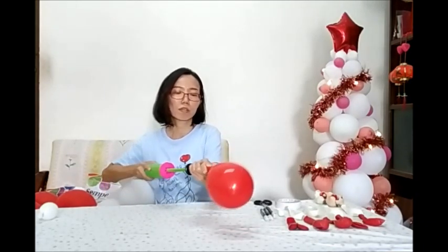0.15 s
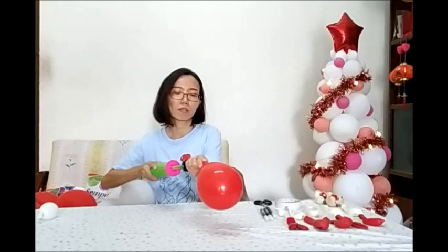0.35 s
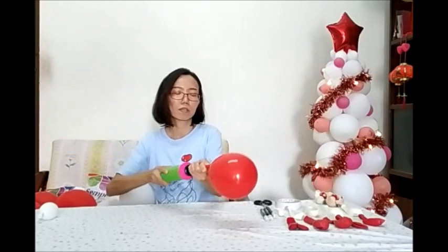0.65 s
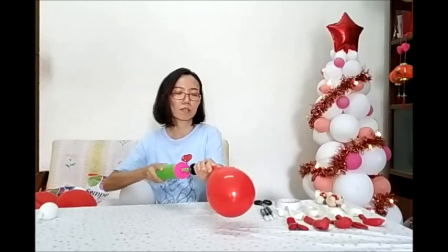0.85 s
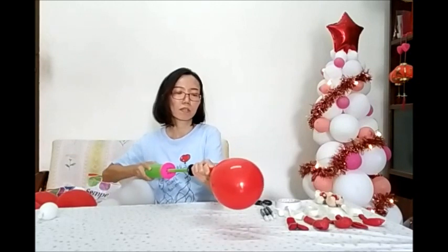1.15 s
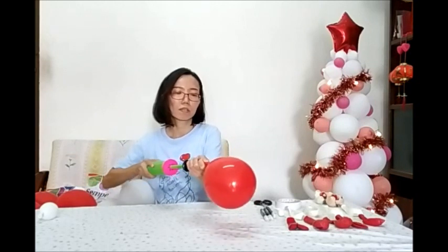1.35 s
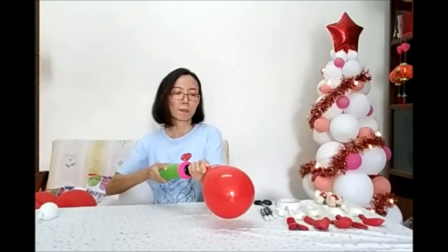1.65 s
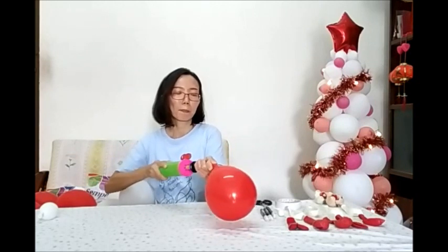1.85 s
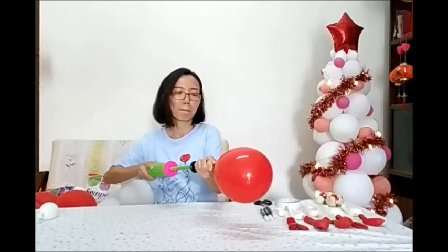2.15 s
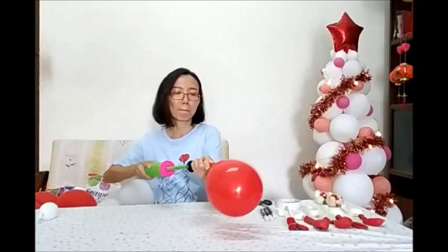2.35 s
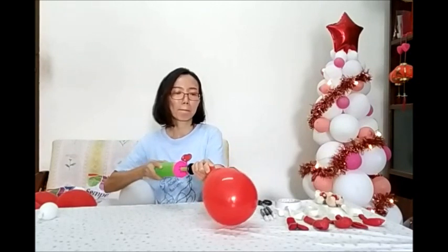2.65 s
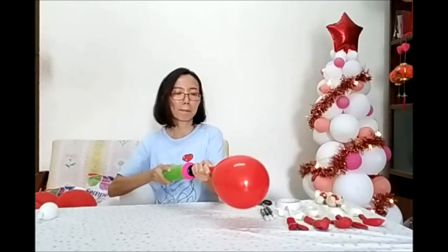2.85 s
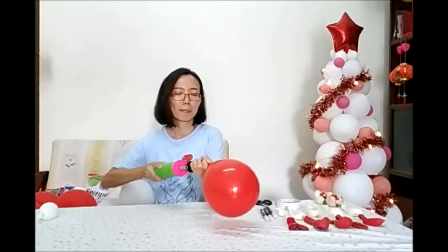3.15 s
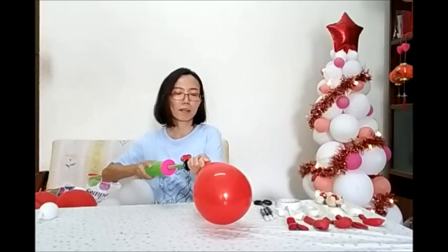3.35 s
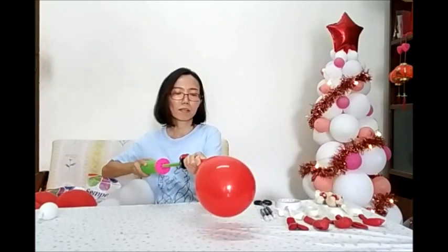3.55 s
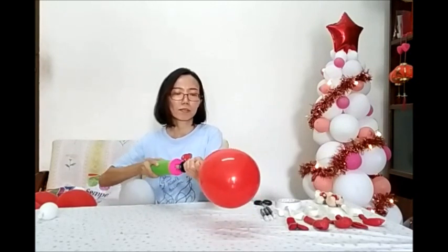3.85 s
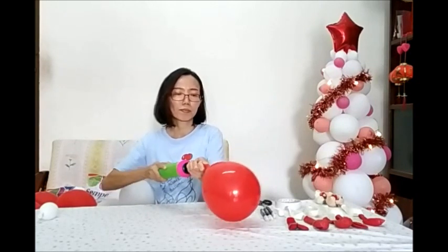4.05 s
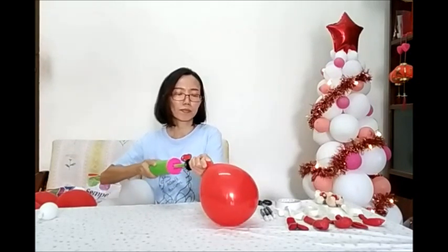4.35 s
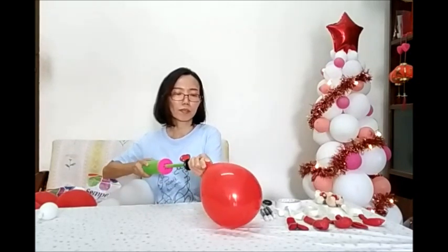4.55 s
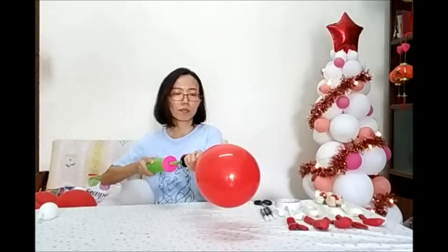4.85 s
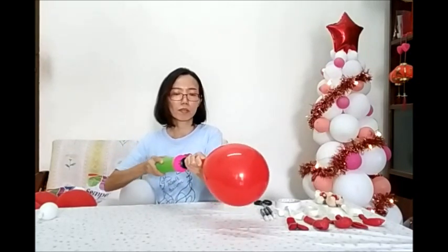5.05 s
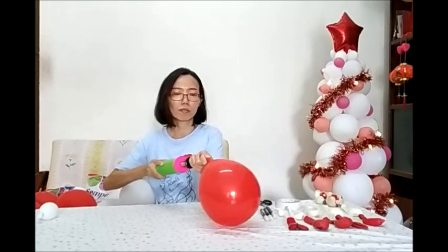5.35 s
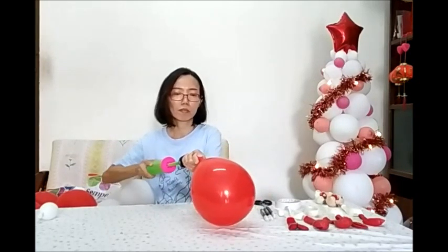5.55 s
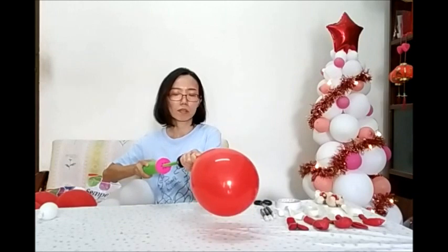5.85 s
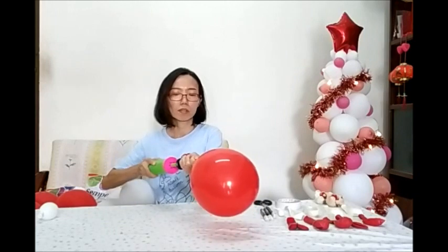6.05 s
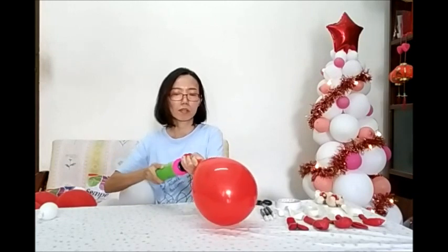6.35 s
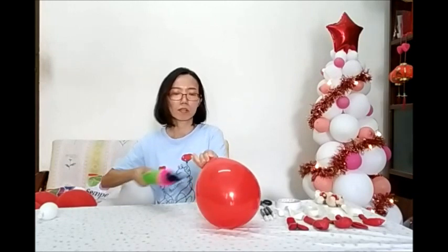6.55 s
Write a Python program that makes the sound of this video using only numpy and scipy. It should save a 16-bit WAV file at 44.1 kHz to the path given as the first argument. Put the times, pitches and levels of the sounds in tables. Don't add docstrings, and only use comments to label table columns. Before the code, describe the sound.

Quiet ventilation rumbles while air rushes through a pump nozzle in short, abrupt hisses, pull then push, six pushes in all. Valves puff open and tick faintly as strokes begin; the piston knocks its stop after each push, the fourth knock hardest. An arm thumps the cloth-covered table occasionally, deepest near the end. Close, slightly right of centre, small indoor room, treble a little grainy and cut off at the top.

```python
import sys
import numpy as np
from scipy import signal
from scipy.fft import rfft, irfft, next_fast_len
from scipy.io import wavfile
from scipy.ndimage import uniform_filter1d

SR = 44100
rng = np.random.default_rng(int(sys.argv[2]) if len(sys.argv) > 2 else 0)


def volts(x):
    e = np.asarray(x, float) / 20
    return 10 ** e


def wav_out(sig):
    wavfile.write(sys.argv[1], SR, np.round(np.clip(np.atleast_2d(sig).T, -1, 1) * 32767).astype(np.int16))


N = 296114


def rms_one(x):
    return x / np.sqrt(np.mean(x ** 2) + 1e-20)


def at_hz(points, hz):
    table_hz, value = np.array(points)[:, 0], np.array(points)[:, 1]
    return np.interp(np.log(hz), np.log(table_hz), value)


def colour(x, spectrum):
    size = next_fast_len(x.shape[-1])
    hz = np.maximum(np.arange(size // 2 + 1) * SR / size, 1)
    return irfft(rfft(x, size) * volts(at_hz(spectrum, hz)), size)[..., :x.shape[-1]]


def flicker(rate_hz):
    r = np.exp(-2 * np.pi * rate_hz / SR)
    noise = rng.standard_normal(N + SR)
    return rms_one(signal.lfilter([1], [1, -2 * r, r * r], noise)[SR:])


def clicks(seconds, db):
    out = np.full(N, 1e-18)
    out[np.round(np.asarray(seconds) * SR).astype(int)] = volts(np.asarray(db))
    return out


def ring(x, hz, t60):
    r = volts(-60 / (t60 * SR))
    w = 2 * np.pi * hz / SR
    return signal.lfilter([0, np.sin(w)], [1, -2 * r * np.cos(w), r * r], x)


def puff(x, fade_s, rise_s):
    fade, rise = volts(-60 / (fade_s * SR)), volts(-60 / (rise_s * SR))
    return signal.lfilter([1 - rise], np.convolve([1, -fade], [1, -rise]), x)


def turbulence(spectrum, eddy_db, gust_db, side_db):
    eddies = volts(eddy_db * flicker(1200) + gust_db * flicker(20))
    mid, side = colour(rng.standard_normal((2, N)) * eddies, spectrum)
    return rms_one(mid + volts(side_db) * side * [[1], [-1]])


# f/Hz, level/dB per Hz
ROOM_AIR = [(13, -7), (25, 12), (60, -4), (95, 0), (140, -4), (200, 3), (260, 2), (350, -4), (960, -6),
            (2200, -15), (4300, -21.5), (9700, -17), (12800, -23), (16000, -29)]
# f/Hz, width/Hz, level/dB
DUCTS = [(92, 8, -60), (202, 8, -61), (534, 1.5, -66)]
# f/Hz, likeness (0 to 1)
LEFT_RIGHT_LIKENESS = [(25, 0.8), (125, 0.96), (250, 0.96), (500, 0.7), (1000, 0.019), (16000, 0.039)]


def background():
    mid, side = rng.standard_normal((2, N))
    share = [(hz, np.clip(c, 0, .99)) for hz, c in LEFT_RIGHT_LIKENESS]
    mid = colour(mid, [(hz, 10 * np.log10(1 + c)) for hz, c in share])
    side = colour(side, [(hz, 10 * np.log10(1 - c)) for hz, c in share])
    air = volts(-49.5) * rms_one(colour(np.array([mid + side, mid - side]), ROOM_AIR))
    ducts = 0
    for hz, width_hz, db in DUCTS:
        ducts = ducts + volts(db) * rms_one(ring(rng.standard_normal(N), hz, 4.8 / width_hz))
    return air + ducts


def stroke_levels(strokes, parts):
    rise_power = 0.97
    t, out = np.arange(N) / SR, np.zeros((len(parts), N))
    for start, rise, hold, full_db, stop_db in strokes:
        age = np.maximum(t - start, 0)
        flow = np.minimum(age / rise, 1) ** rise_power
        flow_db = np.interp(age, [rise, rise + hold], [full_db, stop_db])
        after_stop = np.maximum(age - rise - hold, 0)
        for k, (db, surge_db, surge_s, release) in enumerate(parts):
            surge = surge_db * np.exp(-age / surge_s)
            out[k] += flow * volts(flow_db + db + surge - release * after_stop)
    return out


# start t/s, rise t/s, hold t/s, full-speed jet level/dB, jet level at the stop/dB
PUSHES = [
    (.255, 0.094, 0.23, -28.5, -27.5),
    (1.27, 0.23, 0.14, -27.5, -30.5),
    (2.435, 0.21, 0.17, -28, -27),
    (3.6, 0.31, 0.053, -23, -27.5),
    (4.755, .13, .24, -25.5, -26.5),
    (5.86, 0.19, 0.17, -24.5, -27.5),
]
PULLS = [
    (-.2, 0.16, 0.12, -29, -29.5),
    (.725, 0.17, 0.2, -31, -31),
    (1.775, 0.14, 0.26, -34, -27.5),
    (3.015, 0.25, 0.16, -30, -27),
    (4.135, .18, 0.25, -29, -29),
    (5.265, 0.19, 0.23, -28, -27),
]
SETTLES = [
    (.14, 0.054, .05, -50, -43),
    (1.17, 0.07, .02, -43, -46),
    (3.48, .04, 0.032, -54, -44.5),
    (4.6, .04, .07, -59, -44.5),
    (5.74, .04, .05, -55, -43),
    (6.3, .04, .04, -57, -54),
    (6.4, 0.018, 0.036, -46, -47.5),
]
# level re jet/dB, surge level/dB, surge t/s, release/dB per s
PUSH_PARTS = [(-0.88, -6.3, .05, 155), (-10.5, 4, 0.072, 220), (-0.2, -0.5, 0.13, 133),
              (-18.5, 1.5, 0.043, 121)]
PULL_PARTS = [(1.36, -1.3, .05, 168), (-9.5, -1, .06, 210), (-1, 5.5, 0.12, 130), (-16, 3, 0.07, 117)]
SETTLE_PARTS = [(-3.3, .1, .05, 160), (-18, .1, .05, 140), (-14.5, .1, .05, 47), (-33.5, .1, .05, 40)]
# t/s, leak level at the loosely held neck/dB, valve level as it points at the listener/dB
GRIP = [(0, -2.5, 4), (.34, -11.5, 3), (.55, -8.5, 1), (1, -7.5, -0.5), (1.5, -8, 1), (1.9, -9, 2),
        (2.15, -5.5, 2), (2.65, -12.5, 2.5), (3.3, -9, 1.5), (3.85, -7.5, 1.5), (4.25, -11.5, 5),
        (4.5, -13, 6), (4.95, -8.5, 3), (5.4, -13.5, 4.5), (5.65, -13, 3.5), (6.0, -9.5, 4.5),
        (6.25, -10.5, 5), (6.71, -9, 1)]
# t/s, peak level/dB
CRACKS = [(0.2628, -27), (0.7994, -40), (1.2855, -26.5), (1.8063, -51), (2.441, -34), (3.0494, -54),
          (3.5411, -37), (3.6087, -36), (4.1634, -30), (4.7371, -36), (5.2994, -44), (5.8526, -36),
          (6.4018, -47)]
# t/s, level/dB, t60/s
SLIP = (6.402, -39, .025)
# f/Hz, level/dB per Hz
JET = [(3500, -25), (5000, -15.5), (6100, -7.5), (7700, -1), (9000, -0.5), (10000, 1), (11500, -7),
       (13500, -18.5), (17000, -39)]
VALVE = [(7000, -35), (10500, 2), (12500, 1.5), (15000, 2.5), (15900, -6), (16300, -50)]
NECK = [(2500, -17.5), (3500, -5.5), (4500, -2.5), (5600, 0), (6800, -0.5), (8200, -19.5), (11000, -40)]
BARREL = [(400, -18), (1000, -11), (1700, -2.5), (2500, -2.5), (3300, -1.7), (5000, -34)]


def airflow():
    pushes = stroke_levels(PUSHES, PUSH_PARTS)
    pulls = stroke_levels(PULLS, PULL_PARTS)
    settles = stroke_levels(SETTLES, SETTLE_PARTS)
    jet, valve, neck, barrel = pushes + pulls + settles
    t = np.arange(N) / SR
    s, leak_db, aim_db = np.transpose(GRIP)
    neck = neck * volts(np.interp(t, s, leak_db))
    valve = valve * volts(np.interp(t, s, aim_db))
    puffs = puff(clicks(*np.transpose(CRACKS)), fade_s=.3, rise_s=.02) * volts(-11.0)
    slip_s, slip_db, slip_t60 = SLIP
    slip = signal.lfilter([1], [1, -volts(-60 / (slip_t60 * SR))], clicks([slip_s], [slip_db]))
    jet = jet * turbulence(JET, eddy_db=0.5, gust_db=0.34, side_db=-6.5)
    valve = (valve + puffs) * turbulence(VALVE, eddy_db=-1.5, gust_db=.8, side_db=-1.5)
    neck = (neck + slip) * turbulence(NECK, eddy_db=2.0, gust_db=-0.3, side_db=-6.5)
    barrel = barrel * turbulence(BARREL, eddy_db=.8, gust_db=.6, side_db=.1)
    return jet + valve + neck + barrel


# t/s, thud peak level/dB, thud f/Hz, t60/s, table top level/dB
BUMPS = [
    (0.09, -58, 95, 0.21, -43),
    (0.251, -41, 93, 0.15, -43),
    (1.119, -43, 101, .25, -47),
    (1.284, -41.5, 75.5, 0.84, -45),
    (2.196, -41.5, 102, 0.21, -46.5),
    (3.451, -45, 94, 0.25, -47),
    (6.251, -42.5, 99, 0.43, -80),
    (6.45, -35.5, 51.7, 0.5, -51),
]
# f/Hz, level/dB, t60/s
TABLE_TOP = [(182.8, -5, 0.33), (238, -1.5, 0.25), (319, -3.5, 0.18), (423, 0.5, 0.094), (496, -24, .1)]


def table():
    s, _, _, _, top_db = np.transpose(BUMPS)
    thuds = sum(ring(clicks([a], [db]), hz, t60) for a, db, hz, t60, _ in BUMPS)
    luck = rng.normal(0, 3, (len(s), len(TABLE_TOP)))
    bounce_s, bounce_db = .034, -2.5
    top = 0
    for k, (hz, db, t60) in enumerate(TABLE_TOP):
        first = clicks(s, top_db + db + luck[:, k])
        second = clicks(s + bounce_s, top_db + db + bounce_db - luck[:, k])
        top = top + ring(first + second, hz, t60)
    return signal.lfilter(np.hanning(61) / 30, [1], thuds + top)


# t/s, peak level/dB
TICKS = [
    (0.253, -57),
    (1.282, -59),
    (2.438, -69),
    (4.796, -54),
    (5.901, -65),
    (6.404, -58),
]


def valve_flap():
    return -signal.lfilter([1], [1, -1.7, .73], clicks(*np.transpose(TICKS))) * volts(14)


# t/s, peak level/dB, f/Hz, balloon ring level/dB, bright snap level/dB
KNOCKS = [
    (0.5886, -26.5, 2150, -23, -19),
    (1.6297, -26.5, 2260, -17, -19),
    (2.809, -24.5, 2320, -15.5, -16),
    (3.9568, -22.5, 2240, -24, -12),
    (5.1162, -24.5, 2260, -23, -34),
    (6.2316, -30, 2330, -14, -31),
]
# f/Hz, level/dB, t60/s
BODY = [(595, -23, 0.035), (800, -13.5, 0.013), (3150, -10, .015)]
# f/Hz, level/dB per Hz
BURST = [(700, -35), (1400, -6), (1900, -3.5), (2500, -0.5), (3300, -3), (4000, -11), (6000, -37)]


def piston():
    s, peak_db, hz, ring_db, snap_db = np.transpose(KNOCKS)
    clack = 0
    for knock_s, db, knock_hz in zip(s, peak_db, hz):
        blow = ring(clicks([knock_s + 0.00055], [db - 9]), knock_hz, 0.003)
        clack = clack + ring(blow, knock_hz, 0.003)
    body = sum(ring(clicks(s, peak_db + db), f, t60) for f, db, t60 in BODY)
    snap = ring(clicks(s, snap_db + 5), 9500, .003)
    balloon = ring(clicks(s + .012, peak_db + ring_db), hz=1125, t60=.11)
    escape = puff(clicks(s + 0.0011, -36), fade_s=.6, rise_s=.04)
    bursts = escape * turbulence(BURST, eddy_db=0.0, gust_db=1.0, side_db=1.5)
    return clack + body + snap + balloon, bursts


# f/Hz, level/dB
ECHO = [(200, 3.5), (1000, 6), (2500, 5.5), (5000, 2), (10000, -7.5), (16000, -13.5)]
# f/Hz, t60/s
ECHO_T60 = [(200, 0.095), (2000, 0.26), (8000, 0.17), (16000, 0.5)]


def room(x, level_db):
    t = np.arange(SR // 2) / SR
    noise, echo = rng.standard_normal((2, len(t))), 0
    for hz in 62.5 * 2. ** np.arange(9):
        edges = [hz / 2 ** .5, min(hz * 2 ** .5, 20000)]
        band = signal.butter(2, edges, "band", fs=SR, output="sos")
        t60 = at_hz(ECHO_T60, hz)
        decay = volts(at_hz(ECHO, hz) - 60 * t / t60) / np.sqrt(t60 * SR / 14)
        echo = echo + signal.sosfilt(band, noise) * decay
    echo = echo * np.clip((t - .004) / 0.0055, 0, 1)
    return volts(level_db) * signal.fftconvolve(x[None], echo, axes=1)[:, :N]


# f/Hz, level re its neighbours/dB
BAR = [(600, -30), (1300, -10), (2800, -5), (3800, -2), (5400, 0), (6800, -3), (9000, -8), (10800, -4),
       (12500, 0), (16000, -2)]


def dropouts(x, spread_db):
    hz, s, frames = signal.stft(x, SR, nperseg=2048, noverlap=1536)
    power = np.abs(frames.mean(axis=0)) ** 2
    band = uniform_filter1d(uniform_filter1d(power, size=33, axis=0), size=5, axis=1)
    wander = uniform_filter1d(rng.standard_normal((len(hz) // 8 + 1, len(s))), size=7, axis=1)
    wander = rms_one(wander).repeat(8, axis=0)[:len(hz)]
    bar_db = at_hz(BAR, np.maximum(hz, 1))[:, None] + spread_db * wander
    kept = uniform_filter1d(power, size=3, axis=1) > band * volts(2 * bar_db)
    lost = np.sum(power, axis=1) / np.sum(power * kept + 1e-20, axis=1)
    makeup = np.sqrt(uniform_filter1d(np.minimum(lost, 3), size=33))[:, None]
    return signal.istft(frames * kept * makeup, SR, nperseg=2048, noverlap=1536)[1][:, :N]


def scene():
    rumble, flow, bumps, ticks = background(), airflow(), table(), valve_flap()
    knocks, bursts = piston()
    near = flow + knocks + bursts + ticks + bumps
    echoes = room(flow.mean(axis=0) + volts(9.5) * knocks + volts(-5) * bumps, level_db=-4.5)
    return near * volts(np.array([[-.2], [.2]])) + echoes + rumble


def low_pass(x):
    return signal.sosfilt(signal.butter(12, 16050, fs=SR, output="sos"), x)


def record(dry):
    mix = dropouts(dry, spread_db=4.0)
    return low_pass(mix)


dry = scene()
out = record(dry)
wav_out(out)
```